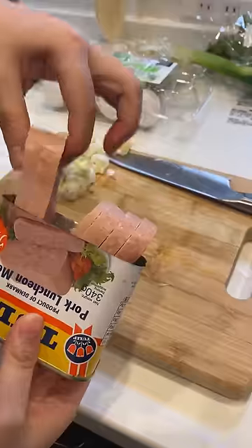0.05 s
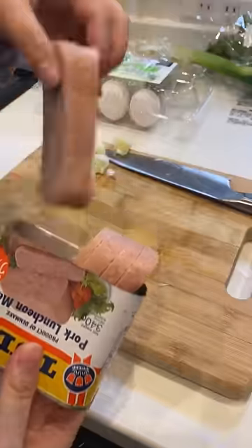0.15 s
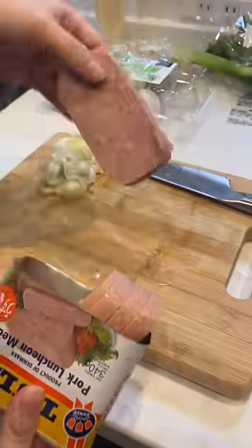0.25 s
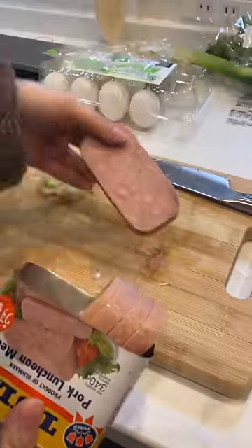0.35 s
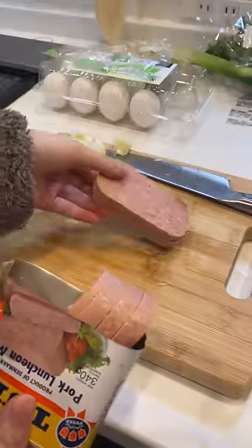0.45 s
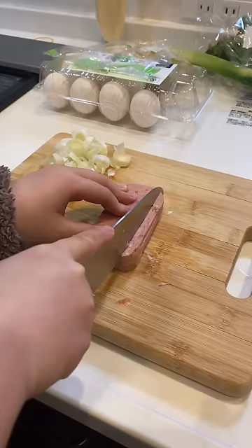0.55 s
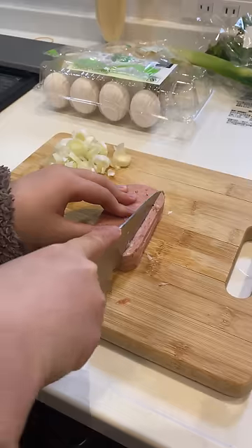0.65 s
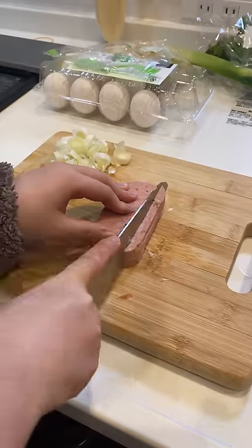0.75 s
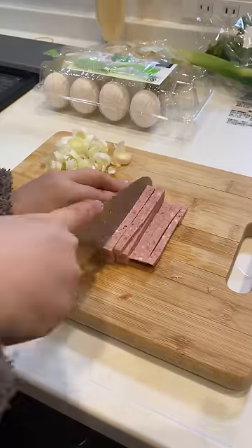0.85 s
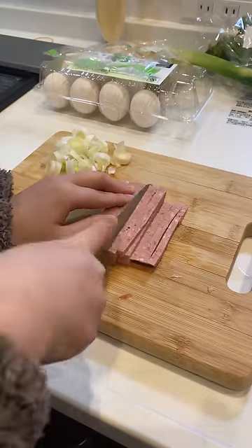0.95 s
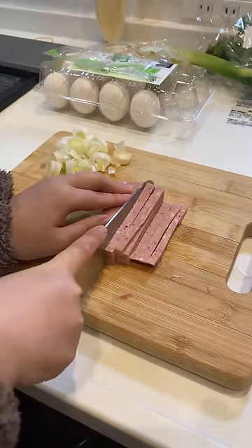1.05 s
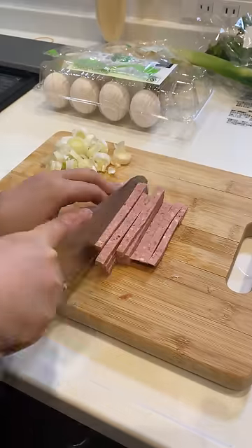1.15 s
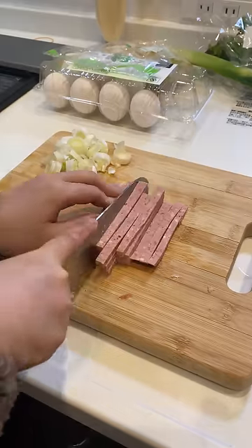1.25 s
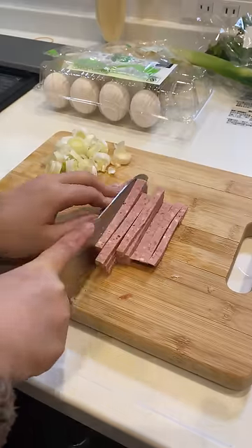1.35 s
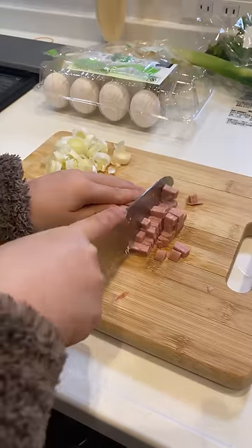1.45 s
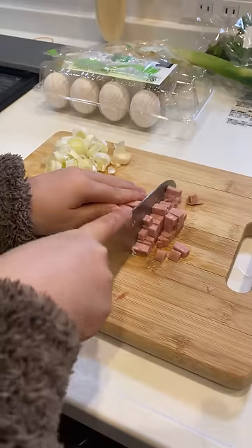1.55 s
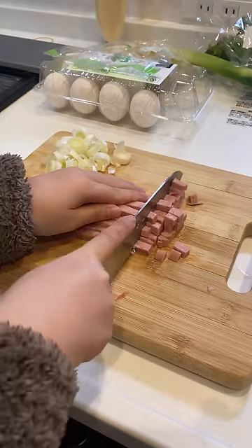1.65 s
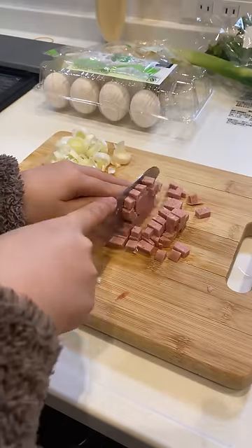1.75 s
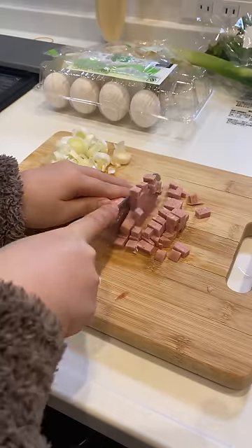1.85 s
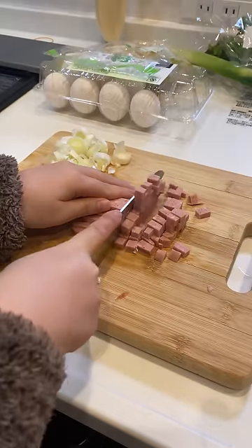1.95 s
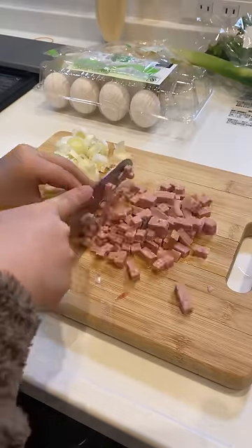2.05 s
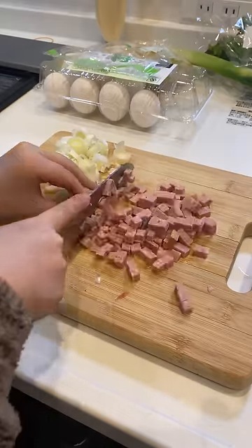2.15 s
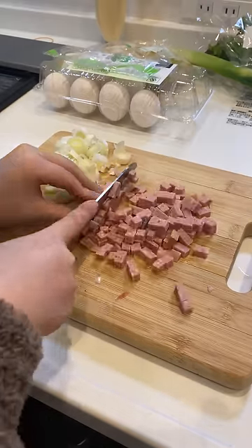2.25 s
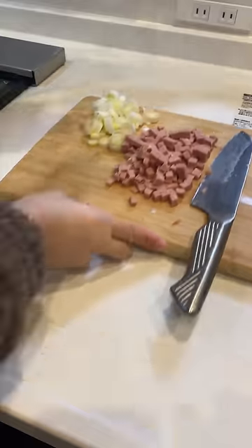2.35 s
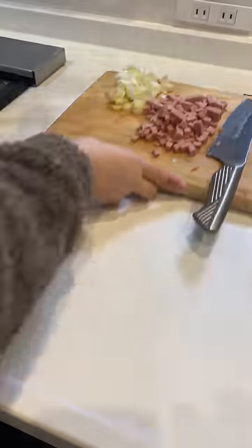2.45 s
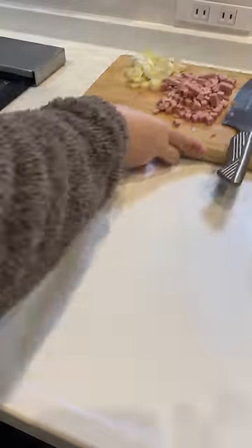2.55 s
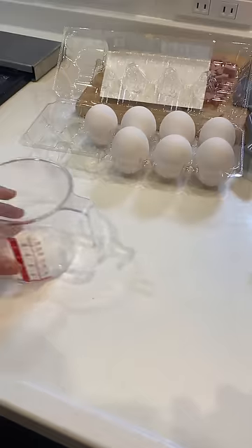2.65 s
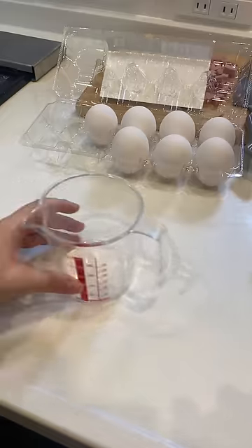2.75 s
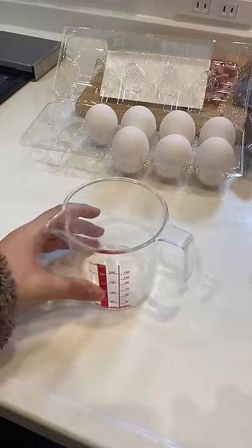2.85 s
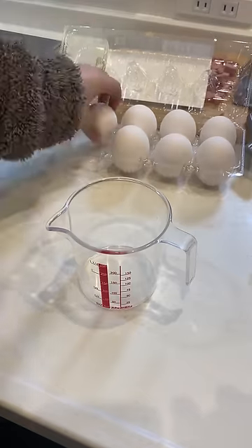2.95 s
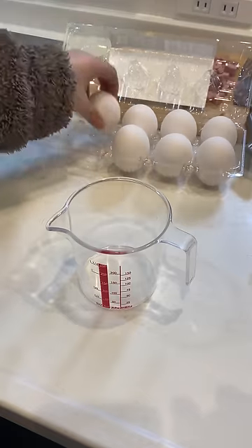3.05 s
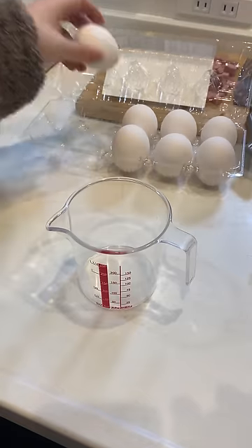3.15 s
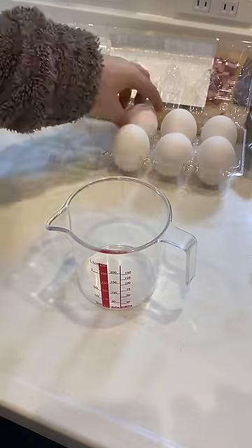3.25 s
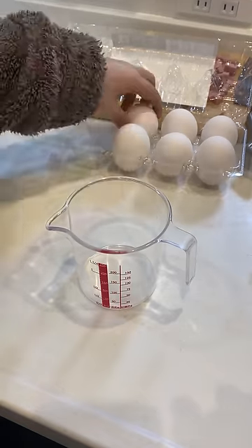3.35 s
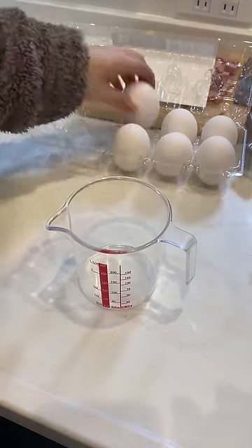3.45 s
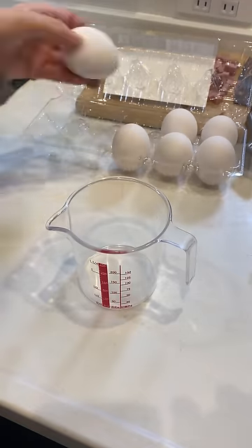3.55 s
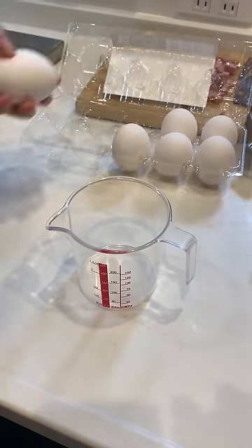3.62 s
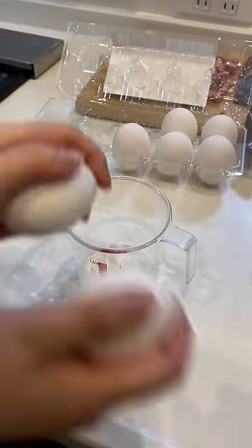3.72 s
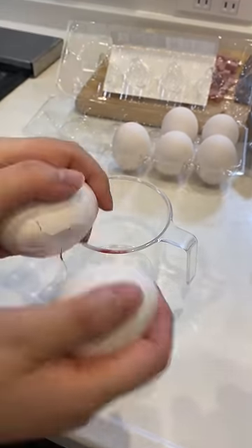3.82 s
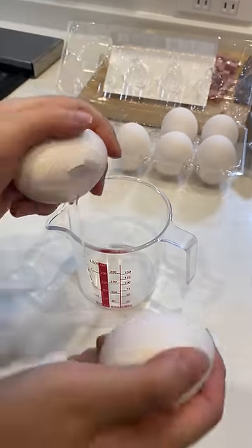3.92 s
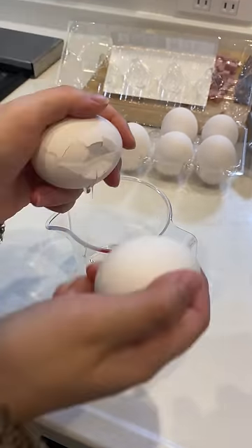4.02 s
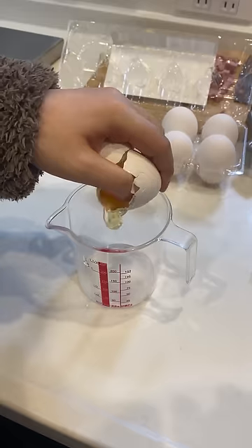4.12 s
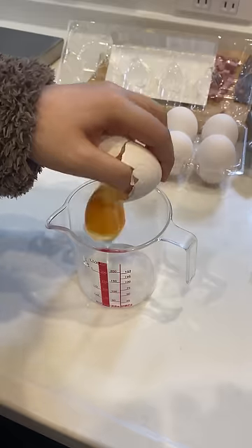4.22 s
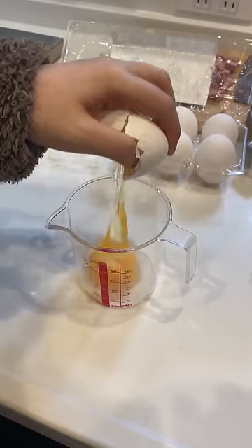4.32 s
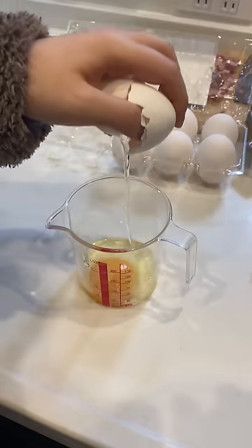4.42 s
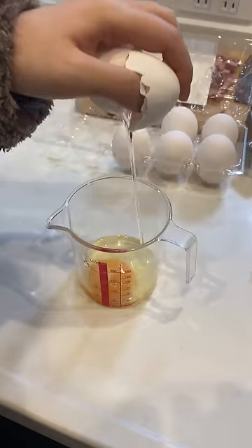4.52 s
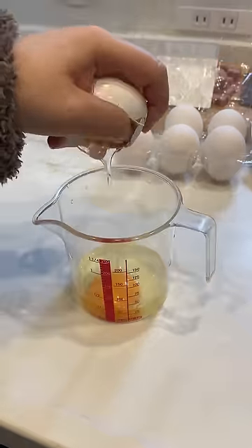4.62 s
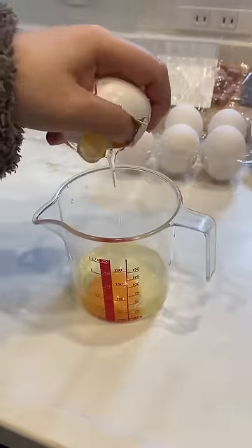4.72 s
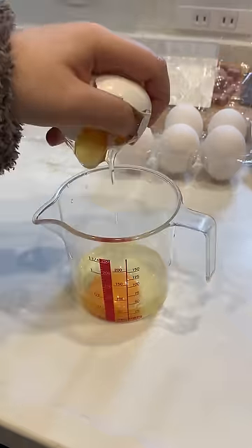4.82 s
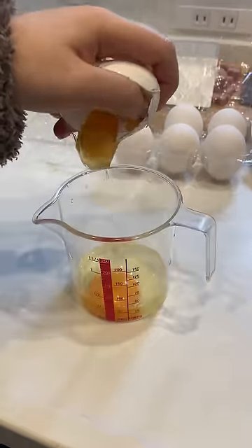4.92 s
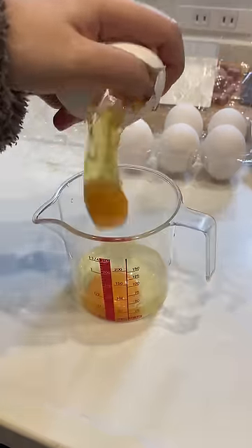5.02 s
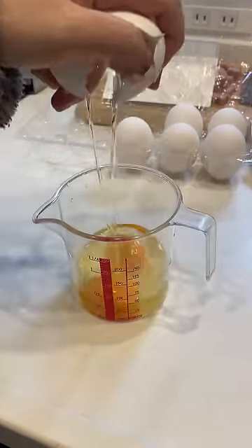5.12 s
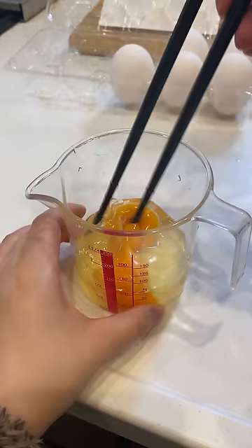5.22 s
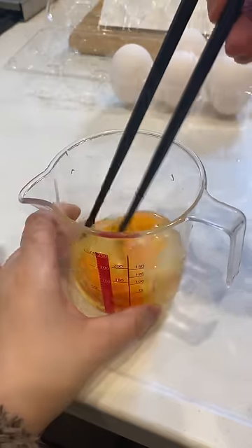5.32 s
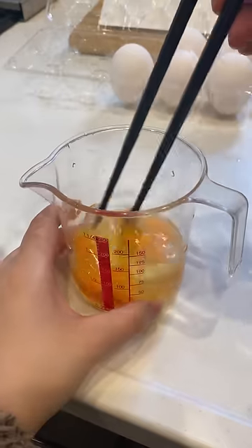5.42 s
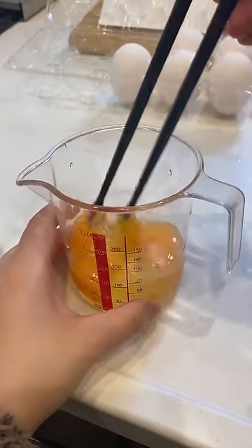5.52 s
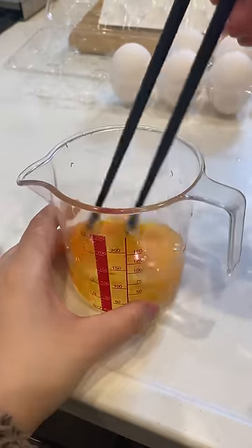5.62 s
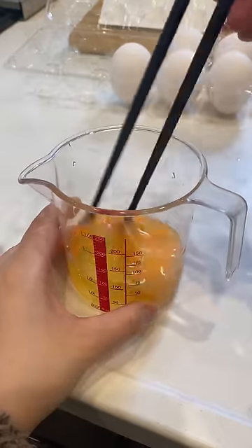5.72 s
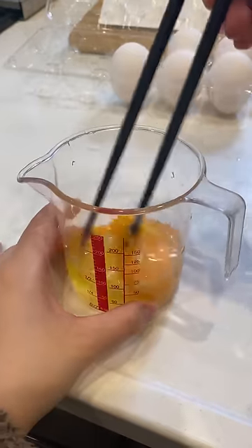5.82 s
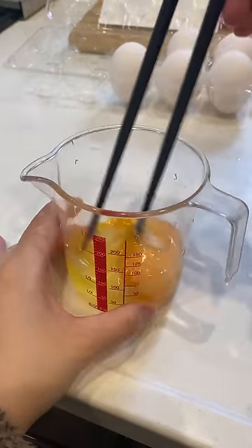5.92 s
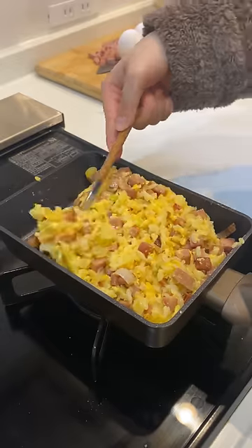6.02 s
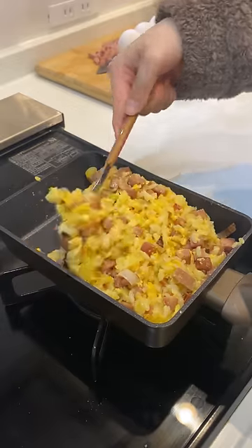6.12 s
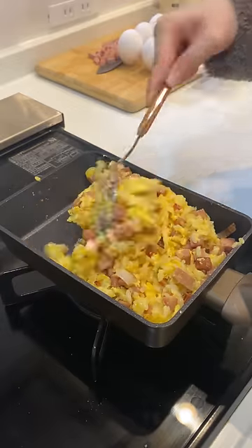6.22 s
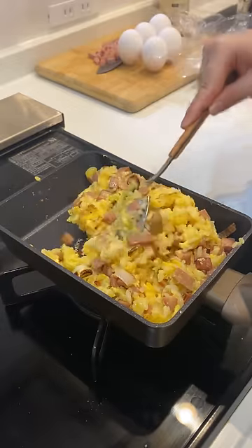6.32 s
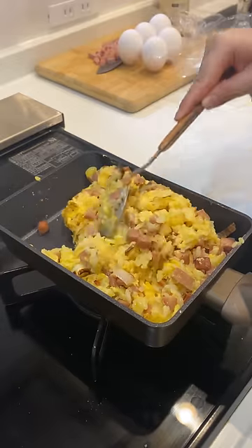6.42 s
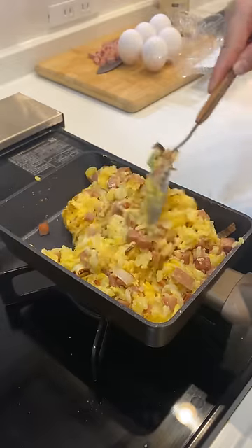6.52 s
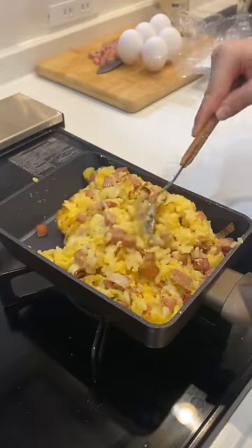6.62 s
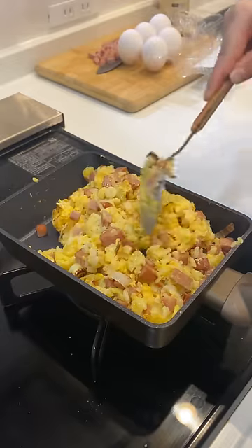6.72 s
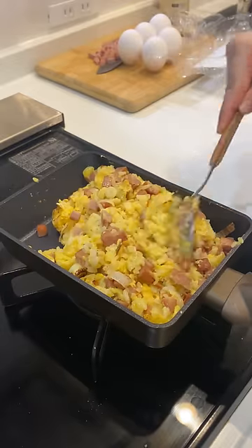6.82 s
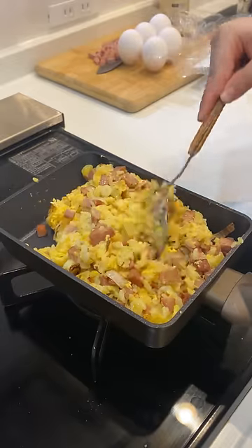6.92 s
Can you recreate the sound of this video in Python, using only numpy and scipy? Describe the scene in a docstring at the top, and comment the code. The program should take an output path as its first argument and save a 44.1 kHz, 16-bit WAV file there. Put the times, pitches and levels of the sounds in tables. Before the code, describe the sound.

In a quiet home kitchen, miked close by, a knife chops six times on a wooden board with faint rubbing. The board knocks and slides on the counter, a plastic cup scrapes, packaging crackles. An egg cracks sharply, its shell breaks with small wet pops, chopsticks clack quickly in the cup, and a pan sizzles, spits and takes two spatula hits.

```python
"""A knife dices meat on a wooden board in a quiet home kitchen, miked from close by on a phone in short, hard-cut shots.
The board and a plastic cup slide over the counter, packaging and shell crackle, an egg is cracked, chopsticks beat
in the cup, and a spatula turns rice that sizzles in a pan. Blows are noise bursts that ring damped modes;
rubbing, frying and room air are coloured noise. Echo and a left-right difference in the treble are added last."""
import sys
import numpy as np
from scipy import signal
from scipy.fft import rfft, irfft, next_fast_len
from scipy.io import wavfile
from scipy.ndimage import uniform_filter1d

SR = 44100
rng = np.random.default_rng(int(sys.argv[2]) if len(sys.argv) > 2 else 0)


def persist_wave(psi):
    """Save psi, clipped to +-1, as 16-bit WAV."""
    counts = np.round(np.clip(psi, -1, 1) * 32767).astype(np.int16)
    wavfile.write(sys.argv[1], SR, np.atleast_2d(counts).T)


N = 307356


def amp(db):
    """Gain of a level in dB."""
    return 10 ** (np.asarray(db) / 20)


def unit(x):
    """x scaled to rms 1."""
    return x / np.sqrt(np.mean(np.abs(x) ** 2) + 1e-20)


def along(points, hz):
    """Value at each frequency, read between (Hz, value) points on a log axis."""
    point_hz, value = np.transpose(points)
    return np.interp(np.log(hz + 1), np.log(point_hz + 1), value)


def shade(spectrum):
    """Gain over frequency of a (Hz, dB) table."""
    return lambda hz: amp(along(spectrum, hz))


def gains(rows):
    """One gain per sample for each dB column, silent outside the table."""
    s, *columns = np.transpose(rows)
    t = np.arange(N) / SR
    return [amp(np.interp(t, s, column, -200, -200)) for column in columns]


def filtered(x, response):
    """x shaped by a complex response of frequency."""
    n = x.shape[-1]
    padded = next_fast_len(n + 4096)
    spectrum = rfft(x, padded) * response(np.fft.rfftfreq(padded, 1 / SR))
    return irfft(spectrum, padded)[..., :n]


def peak(f, hz, width_hz):
    """Response of one causal resonance, 1 at its centre."""
    return 1j * f * width_hz / (hz * hz - f * f + 1j * f * width_hz)


# Left-right likeness of nearby sounds. Each row: frequency in Hz, likeness (1 = identical).
NEAR_LIKENESS = [(60, 0.26), (240, 0.88), (950, 0.97), (3770, 1), (15000, 0.91)]


def rush(colour, alike, patchy_db, grit_db):
    """Stereo noise of rms 1: patches of random gain, roughened by millisecond grains."""
    grit = amp(grit_db * np.repeat(rng.exponential(1, N // 32 + 1), 32)[:N])
    z = signal.stft(rng.standard_normal((2, N)) * grit, nperseg=256)[2]
    field = uniform_filter1d(rng.standard_normal(z.shape[1:]), size=5, axis=0)  # smooth over frequency
    field = uniform_filter1d(field, size=8, axis=1)  # and over time
    pair = signal.istft(z * amp(patchy_db * unit(field)), nperseg=256)[1][:, :N]

    def mid_side(hz):
        angle = np.arccos(np.clip(along(alike, hz), -1, 1)) / 2
        return colour(hz) * [np.cos(angle), np.sin(angle)]

    mid, side = filtered(pair, mid_side)
    return unit(np.array([mid + side, mid - side]))


def ring(modes, t, wander=.013):
    """Sum of damped modes whose strength and pitch vary randomly with the point of contact."""
    hz, db, t60 = np.transpose(modes)[:, :, None]
    chance = rng.standard_normal((2, len(hz), 1))
    decay = amp(db + 2.5 * chance[0] - 60 * t / t60)
    return np.sum(decay * np.sin(2 * np.pi * hz * (1 + wander * chance[1]) * t), 0)


# Where one shot is cut to the next. Each entry: time in seconds.
SHOT_CUTS = [0.036, 0.575, 0.848, 1.149, 1.433, 1.733, 2.021, 2.286, 2.599, 2.916, 3.647, 4.059, 4.63,
             5.243, 5.958]


def add(track, s, sound, db, pan_db):
    """Lays a sound of the given peak level into the stereo track, up to the next cut."""
    room_s = min([cut - s for cut in SHOT_CUTS if cut > s], default=1)
    sound = amp(db) * sound[:round(room_s * SR) + 1] / np.abs(sound).max()
    start = round(s * SR)
    track[:, start:start + len(sound)] += sound * amp([[pan_db / 2], [-pan_db / 2]])  # positive is left


def contact(modes, ring_db, contact_s, bright_db, low_hz, rattle_db, rattle_s, size=SR // 5):
    """A decaying noise force and its longer rattle are heard directly and through the modes they excite."""
    t = np.arange(size) / SR
    force = rng.standard_normal(len(t)) * (amp(-60 * t / contact_s) + amp(rattle_db - 60 * t / rattle_s))
    force[0] = 2.59  # a strong first sample, so that every blow excites all modes
    ringing = signal.fftconvolve(force, ring(modes, t))[:len(t)]
    sound = force / np.abs(force).max() + amp(ring_db) * ringing / np.abs(ringing).max()

    def tilt(f):
        slope = (1 + 1j * f / 500) ** (bright_db / (20 * np.log10(2)))  # dB per octave above 500 Hz
        return slope * (1j * f / (low_hz + 1j * f)) ** 2

    return filtered(sound, tilt)


# What the counter rings with. Each row: frequency in Hz, relative level in dB, t60 in seconds.
COUNTER_MODES = [(99, -9.5, 0.05), (159, -4, 0.09), (205, 0, 0.07), (252, 0, 0.05), (334, 2, 0.038),
                 (456, -2, 0.065), (572, -2.5, 0.089), (700, -5.5, 0.021), (1015, -2, 0.022)]


def blows(rows, modes, ring_db, contact_s, low_hz, rattle_db, rattle_s, thud_db, thud_grows, pan_db):
    """Blows on one body, each passing a soft thud into the counter."""
    track = np.zeros((2, N + SR))

    def soft(f):  # cuts the deep bass and softens the treble of the thud
        return (1j * f / (110 + 1j * f)) ** 2 / (1 + 1j * f / 1500) ** 2

    for s, db, bright_db in rows:
        blow = contact(modes, ring_db, contact_s, bright_db, low_hz, rattle_db, rattle_s)
        add(track, s, blow, db, pan_db)
        thud = filtered(ring(COUNTER_MODES, np.arange(SR // 4) / SR), soft)
        add(track, s, thud, thud_db + thud_grows * db, 0)
    return track[:, :N]


def harder(rows, bright_db, per_db):
    """Adds the brightness column, which rises by per_db for each dB of peak level."""
    return [(s, db, bright_db + per_db * db) for s, db in rows]


def snaps(rows, ring_db, cycles, contact_s, low_hz, bright_db, wide_db):
    """Tiny dry breaks, each coloured by a few cycles of the fragment or bubble that it leaves."""
    track = np.zeros((2, N + SR))
    for s, db, hz in rows:
        sound = contact([(hz, 0, cycles / hz)], ring_db, contact_s, bright_db, low_hz,
                        rattle_db=-17, rattle_s=.03, size=SR // 16)
        add(track, s, sound, db, wide_db * rng.standard_normal())
    return track[:, :N]


# Colour of the room air. Each row: frequency in Hz, relative level in dB.
AIR_COLOUR = [(12, -45), (20, 0), (42, -22.5), (137, -15.5), (232, -25), (405, -13.5), (441, -20),
              (728, -17.5), (1110, -21), (2850, -29), (3280, -28), (3870, -30), (15600, -38.5)]
# Left-right likeness of the room air. Each row: frequency in Hz, likeness.
AIR_LIKENESS = [(60, 4.5), (240, 0), (950, 0.5), (3770, 0.4), (15000, 0.5)]
# An appliance that hums through one shot. Each row: frequency in Hz, rms level in dB.
APPLIANCE_HUM = [(414, -69.5), (828, -79)]
# Faint narrow hisses of the room. Each row: frequency in Hz, resonance width in Hz, rms level in dB.
ROOM_WHINE = [(3274, 110, -86.5), (750, 25, -83), (895, 40, -83)]


def air():
    """Steady room noise, narrow bands of filtered noise, and an appliance's sine hum in one shot."""
    t = np.arange(N) / SR
    hum = sum(np.sqrt(2) * amp(db) * np.sin(2 * np.pi * hz * t) for hz, db in APPLIANCE_HUM)
    hum = hum * (t > SHOT_CUTS[11]) * (t < SHOT_CUTS[12])
    whine = 0
    for hz, width_hz, db in ROOM_WHINE:
        hiss = filtered(rng.standard_normal(N), lambda f: peak(f, hz, width_hz) ** 2)
        whine = whine + amp(db) * unit(hiss)
    return amp(-67) * rush(shade(AIR_COLOUR), AIR_LIKENESS, patchy_db=-2.0, grit_db=-2.5) + hum + whine


# Blade, food, fingers and packaging rub close to the microphone.
# Each row: start in seconds, length in seconds, level in dB, share of treble from 0 to 1.
HAND_RUBS = [(0, 0.037, -51.5, 0.58), (0.662, 0.07, -51.5, 0.12), (1.526, 0.11, -62.5, 0),
             (1.647, 0.039, -65, 0), (2.919, 0.06, -54.5, 0.4), (2.987, 0.06, -44.5, 0),
             (3.269, 0.12, -57, 0.06), (3.588, 0.1, -71, 1), (4.058, 0.098, -57, 0.78),
             (4.272, 0.066, -54, 0.2), (4.63, 0.074, -56.5, 0.84), (4.719, 0.091, -53, 1),
             (4.792, 0.16, -57, 0.1), (4.985, 0.13, -64, 0.13), (5.243, 0.051, -48, 0.03)]
# A faint rub around each chop: start in seconds relative to the chop, then length, level and treble as above.
BLADE_RUB = (-0.06, 0.28, -68, 0.76)
# Colour of the dull rubs. Each row: frequency in Hz, relative level in dB.
DULL_RUSTLE = [(300, -37), (700, -13), (1800, -6), (3300, -19), (5000, -17.5), (8200, -21), (9600, -40),
               (16500, -53)]
# Colour of the bright rubs. Each row: frequency in Hz, relative level in dB.
BRIGHT_SWISH = [(1000, -32), (3000, -11), (7000, 9.5), (10000, 2), (14000, 5), (16500, -12.5)]


def hands():
    """Noise strokes that swell and die, each mixed between a dull rustle and a bright swish."""
    t = np.arange(N) / SR
    dull, bright = np.zeros((2, N))
    blade = [(chop_s + BLADE_RUB[0], *BLADE_RUB[1:]) for chop_s, *_ in KNIFE_CHOPS]
    for s, length_s, db, treble in list(HAND_RUBS) + blade:
        stroke = amp(db) * np.sin(np.pi * np.clip((t - s) / length_s, 0, 1) ** 0.53)  # rises faster than it falls
        dull += stroke * np.sqrt(1 - np.clip(treble, 0, 1))
        bright += stroke * np.sqrt(np.clip(treble, 0, 1))
    rustle = dull * rush(shade(DULL_RUSTLE), NEAR_LIKENESS, patchy_db=2, grit_db=2)
    return rustle + bright * rush(shade(BRIGHT_SWISH), NEAR_LIKENESS, patchy_db=4.5, grit_db=2.0)


# Level of the low rumble. Each row: time in seconds, level in dB.
RUMBLE_LEVEL = [(0, -65), (.45, -62), (1.45, -59.5), (1.62, -49.5), (1.95, -60), (2.3, -60), (2.45, -47),
                (2.6, -67), (3, -61.5), (4.2, -67.5), (5.2, -66), (5.28, -53.5), (5.6, -51), (5.95, -52.5)]
# Colour of the low rumble. Each row: frequency in Hz, relative level in dB.
RUMBLE_COLOUR = [(30, -14.5), (60, -7), (110, -7.5), (150, 1), (210, -7), (330, -11), (700, -24.5),
                 (1500, -94.5)]


def weight():
    """A low rumble of bass noise, perhaps the counter under the working hands."""
    return gains(RUMBLE_LEVEL)[0] * rush(shade(RUMBLE_COLOUR), NEAR_LIKENESS, patchy_db=3.5, grit_db=0)


# Hands, board and cup knock the counter.
# Each row: start in seconds, peak level in dB, brightness in dB per octave.
COUNTER_BUMPS = [(0.465, -57, -24), (0.72, -42.5, -7), (1.593, -43.5, -7.5), (1.69, -29.5, -5.5),
                 (1.968, -44, -12), (2.356, -8.5, -8.5), (2.481, -33.5, -6), (2.56, -35, 3),
                 (3.005, -38, -4.5), (3.085, -42, -8.5), (3.386, -45, -8), (4.27, -36, -7),
                 (4.291, -32, -9), (5.124, -32.5, -7), (5.28, -29.5, -12.5)]


def bumps():
    """Fairly long contacts that set the counter's low modes ringing."""
    return blows(COUNTER_BUMPS, COUNTER_MODES, ring_db=-30, contact_s=0.032, low_hz=230, rattle_db=-10.5,
                 rattle_s=0.13, thud_db=-3, thud_grows=1.0, pan_db=1.0)


# The knife meets the board. Each row: start in seconds, peak level in dB, brightness in dB per octave.
KNIFE_CHOPS = [(0.633, -19.5, -4.5), (0.933, -26, -4), (1.185, -23, -4), (1.496, -16.5, 1),
               (1.817, -15.5, -1.5), (2.104, -22.5, -5)]
# What the wooden board rings with. Each row: frequency in Hz, relative level in dB, t60 in seconds.
BOARD_MODES = [(525, -17, .03), (820, -17, .025), (1100, -13, .015), (1330, -11, .015), (1590, 0, .025),
               (1840, -3, .02), (2100, -5, .018), (2500, -9, .012), (3850, -7, .012), (5400, -9, .006),
               (7500, -24, .005)]


def chops():
    """Very short contacts in which the ringing wood outweighs the crack."""
    return blows(KNIFE_CHOPS, BOARD_MODES, ring_db=14.5, contact_s=0.0051, low_hz=416, rattle_db=-21,
                 rattle_s=0.077, thud_db=-23, thud_grows=0.32, pan_db=-3.5)


# The board slides over the counter. Each row: time in seconds, level in dB.
BOARD_SLIDE_LEVEL = [(2.287, -45), (2.32, -46), (2.45, -47), (2.48, -42.5), (2.6, -47)]
# Colour of wood on the counter. Each row: frequency in Hz, relative level in dB.
WOOD_COLOUR = [(120, -34), (200, -19), (304, -4), (407, -12), (608, -8), (892, -16.5), (1280, -12.5),
               (3250, -17.5), (7660, -11.5), (15600, -14)]
# The cup is dragged over the counter. Each row: time in seconds, level in dB.
CUP_SLIDE_LEVEL = [(2.601, -46.5), (2.66, -37.5), (2.72, -39.5), (2.8, -43), (2.83, -49), (2.88, -56.5),
                   (2.917, -77)]
# Colour of plastic on the counter. Each row: frequency in Hz, relative level in dB.
CUP_COLOUR = [(180, -47), (300, -13.5), (970, -5), (1380, -10), (1690, -3), (3190, -11.5), (14900, -12.5),
              (15700, -5), (16500, -36)]
# Resonances of the cup wall. Each row: frequency in Hz, width in Hz, relative level in dB.
CUP_WALL_PEAKS = [(990, 150, -9), (1710, 150, -3.5), (5750, 140, -1), (8700, 150, -18), (10100, 240, -1),
                  (11800, 190, -3), (13200, 270, -15), (14700, 320, -14)]


def slides():
    """The board hisses over the counter; the dragged cup's noise sings in its wall resonances."""
    board = gains(BOARD_SLIDE_LEVEL)[0] * rush(shade(WOOD_COLOUR), NEAR_LIKENESS, patchy_db=2.0, grit_db=0.6)

    def wall(f):
        singing = sum(amp(db + 7.0) * peak(f, hz, width_hz) for hz, width_hz, db in CUP_WALL_PEAKS)
        return shade(CUP_COLOUR)(f) * np.abs(1 + singing)

    return board + gains(CUP_SLIDE_LEVEL)[0] * rush(wall, NEAR_LIKENESS, patchy_db=3.0, grit_db=1.0)


# Egg shell and thin packaging crackle. Each row: start in seconds, peak level in dB, loudest frequency in Hz.
SHELL_CRACKLES = [(2.9284, -39, 2780), (2.945, -39, 3800), (2.978, -32.5, 6440), (3.0099, -26, 4100),
                  (3.0225, -40, 2430), (3.2973, -27.5, 4000), (3.3305, -41, 3550), (3.9, -40, 5110),
                  (4.0718, -34, 8000), (4.0835, -25, 7940), (4.0969, -46, 4070), (4.115, -31, 4460),
                  (4.12, -32.5, 4630), (4.2027, -28.5, 8200), (4.2164, -40, 7700), (4.2712, -20.5, 4800),
                  (4.3265, -24, 3970), (4.3773, -38.5, 7300), (4.438, -45.5, 7160), (4.4706, -23.5, 4300),
                  (4.6362, -43.5, 4800), (4.717, -39, 12100), (4.726, -25, 8000), (4.732, -18, 7640),
                  (4.739, -8, 7860), (4.7927, -41, 7040), (4.812, -26, 6900), (4.8184, -16.5, 7350),
                  (4.8773, -42, 5850), (4.9026, -25.5, 6120), (4.9875, -32, 2720), (5.022, -41, 6000),
                  (5.045, -45, 3500), (5.1248, -39, 3730), (5.176, -51, 7000)]


def crackles():
    """Breaks of shell and packaging, each ringing a few cycles at its own pitch."""
    return snaps(SHELL_CRACKLES, ring_db=-4.5, cycles=7.2, contact_s=0.0063, low_hz=1624, bright_db=1.3, wide_db=0.0)


# Hard blows shake the phone. Each row: start in seconds, peak level in dB.
PHONE_JOLTS = [(3.7205, -35), (5.301, -42), (6.554, -38.5)]


def jolts():
    """Each blow gives the microphone membranes one slow push and return."""
    track = np.zeros((2, N + SR))
    u = np.arange(SR // 8) / SR / .006  # time in units of 6 ms
    for s, db in PHONE_JOLTS:
        add(track, s, u * (1 - u / 2) * np.exp(-u), db, 0)
    return track[:, :N]


# The egg is struck. Each row: start in seconds, peak level in dB.
EGG_BLOW = [(3.7215, 2.5)]
# What the shell rings with. Each row: frequency in Hz, relative level in dB, t60 in seconds.
SHELL_MODES = [(670, -14, .005), (1170, -11, .005), (3950, -3, .003), (5150, 0, .003), (12300, 1, .002)]


def egg():
    """A bright crack with the very short ring of a thin shell."""
    return blows(harder(EGG_BLOW, bright_db=1.16, per_db=0), SHELL_MODES, ring_db=-2.5, contact_s=0.0095, low_hz=203,
                 rattle_db=-19.0, rattle_s=0.042, thud_db=-48, thud_grows=0, pan_db=2.0)


# The air in the opening shell pops, mostly higher as the gap widens.
# Each row: start in seconds, peak level in dB, frequency in Hz.
SHELL_POPS = [(4.7247, -37, 1420), (4.7379, -29.5, 1542), (4.7947, -40.5, 1520), (4.8119, -31, 1740),
              (4.9007, -28.5, 1965), (4.9866, -31.5, 2600), (5.0004, -40.5, 2720)]


def hollow():
    """Short wet pops of trapped air: one damped resonance driven by a fading noise burst."""
    track = np.zeros((2, N + SR))
    t = np.arange(SR // 5) / SR
    for s, db, hz in SHELL_POPS:
        cavity = ring([(hz, 0, 0.038)], t)  # t60 in seconds
        burst = rng.standard_normal(400) * np.hanning(800)[400:]
        add(track, s, signal.fftconvolve(cavity, burst), db, 0)
    return track[:, :N]


# One chopstick strikes the cup just before the other.
# Each row: start in seconds, peak level in dB, lead of the first stick in seconds, its peak level in dB.
CHOPSTICK_BEATS = [(5.306, -4.5, 0.012, -22), (5.43, -5, .013, -10), (5.511, -5.5, .008, -16),
                   (5.615, -0.5, .006, -13), (5.716, 4, .009, -13), (5.826, 4, 0.0087, -19.5),
                   (5.927, -1, 0.0045, -34)]
# Further single strikes of a chopstick on the cup, without a lead. Each row: start in seconds, peak level in
# dB.
CHOPSTICK_SINGLE_STRIKES = [(5.338, -19), (5.55, -18.5)]
# What the plastic cup rings with. Each row: frequency in Hz, relative level in dB, t60 in seconds.
CUP_MODES = [(240, -2, .07), (567, -7, .045), (900, -17, .03), (1990, -4, .025), (2900, -7, .008),
             (3300, -7, .012), (3960, -7, .012), (4750, -7, .01), (5870, -3, .014), (7500, -9, .005),
             (11200, -9, .006), (14800, -8, .006)]


def chopsticks():
    """Both sticks and a few further single strikes hit the cup, brighter when harder, with a long faint rattle."""
    first = [(s - lead_s, first_db) for s, _, lead_s, first_db in CHOPSTICK_BEATS]
    second = [(s, db) for s, db, *_ in CHOPSTICK_BEATS]
    rows = harder(first + second + list(CHOPSTICK_SINGLE_STRIKES), bright_db=1.34, per_db=0.1265)
    return blows(rows, CUP_MODES, ring_db=-5.0, contact_s=0.03, low_hz=250, rattle_db=-53,
                 rattle_s=0.38, thud_db=-23.5, thud_grows=1.0, pan_db=1.4)


# The pan's steady sound. Each row: time in seconds, fizz level in dB, stirring level in dB.
SIZZLE_LEVEL = [(5.96, -36.5, -39.5), (6.05, -40, -54.5), (6.25, -39, -55.5), (6.3, -34.5, -55),
                (6.45, -42, -61.5), (6.6, -33.5, -40.5), (6.7, -39, -57.5), (6.8, -35.5, -51),
                (6.97, -39, -55)]
# Colour of the steam. Each row: frequency in Hz, relative level in dB.
FIZZ_COLOUR = [(410, -46), (700, -9), (1050, -15), (1240, -5.5), (1430, -13.5), (2130, -5.5), (3040, -7.5),
               (5580, -3), (14300, -9.5), (15900, -10), (16500, -40)]
# Colour of the pushed rice. Each row: frequency in Hz, relative level in dB.
STIR_COLOUR = [(35, -38), (60, -0.5), (306, -4.5), (412, 2), (962, -13), (1280, -22), (1500, -3.5),
               (1950, -28), (3300, -120)]


def frying():
    """Gritty noise of dense tiny steam bursts over the soft low push of the rice."""
    fizz, stir = gains(SIZZLE_LEVEL)
    steam = fizz * rush(shade(FIZZ_COLOUR), NEAR_LIKENESS, patchy_db=2.5, grit_db=3.0)
    return steam + stir * rush(shade(STIR_COLOUR), NEAR_LIKENESS, patchy_db=1.5, grit_db=1)


# The loudest spits of hot fat. Each row: start in seconds, peak level in dB, loudest frequency in Hz.
FAT_SPITS = [(6.1813, -14, 4300), (6.2296, -5.5, 7600), (6.2888, -15, 5100), (6.324, -20, 7600),
             (6.6476, -15.5, 8700), (6.6926, -12.5, 9100), (6.03, -24, 7660), (6.763, -6.5, 5800),
             (6.8182, -10.5, 3200), (6.8449, -9, 10700)]


def spits():
    """Bubbles of hot fat burst as bright snaps, scattered across the stereo width."""
    return snaps(FAT_SPITS, ring_db=-3.5, cycles=9.1, contact_s=0.0038, low_hz=1200, bright_db=1.94, wide_db=-2.5)


# The spatula hits the pan. Each row: start in seconds, peak level in dB.
SPATULA_BLOWS = [(6.553, 2.5), (6.802, -5)]
# What the pan rings with. Each row: frequency in Hz, relative level in dB, t60 in seconds.
PAN_MODES = [(780, -12, .02), (1280, -7, .015), (2180, -2, .008), (3050, -4, .008), (3900, -1, .008),
             (4600, -3, .005), (5600, -2, .005), (6800, -2, .007), (7400, -3, .007), (9000, -10, .004)]


def spatula():
    """Short contacts with the pan's well-damped modes, brighter when harder."""
    return blows(harder(SPATULA_BLOWS, bright_db=1.82, per_db=0.26), PAN_MODES, ring_db=7.5, contact_s=0.011,
                 low_hz=490, rattle_db=-16, rattle_s=0.15, thud_db=-32, thud_grows=0.75, pan_db=2.0)


# Reverberation of the kitchen. Each row: frequency in Hz, t60 in seconds.
KITCHEN_DECAY = [(150, 0.16), (1000, 0.24), (4000, 0.15), (14000, .17)]


def shots(near, far, steady):
    """Each shot has its own echo and ends abruptly; after the first, its steady sounds fade in."""
    out = np.zeros((2, N))
    edges = [0] + [round(s * SR) for s in SHOT_CUTS] + [N]
    for a, b in zip(edges, edges[1:]):
        hz, t, z = signal.stft(rng.standard_normal((2, SR // 3)), SR, nperseg=256)
        z[1] = along(NEAR_LIKENESS, hz)[:, None] * z[0] + 1.2 * z[1]  # the two microphone ports are close together
        decay = amp(-60 * t / along(KITCHEN_DECAY, hz)[:, None])
        tail = signal.istft(z * decay, SR, nperseg=256)[1]
        tail = tail / np.linalg.norm(tail, axis=1, keepdims=True)
        delayed = np.pad(far[a:b], (150, 0))  # samples before the first echo
        echo = signal.fftconvolve(delayed[None], tail, axes=1)
        # starts at -25 dB and rises on a 34 ms ramp
        fade = np.minimum(amp(-25) + np.arange(b - a) / (0.034 * SR), 1) if a else 1
        out[:, a:b] = near[:, a:b] + echo[:, :b - a] + fade * steady[:, a:b]
    return out


def scene():
    """All contacts with their share of echo, over the rubbing, frying and room air."""
    contacts = [(bumps(), -10), (chops(), -6.5), (crackles(), -12), (egg(), -13), (hollow(), -11),
                (chopsticks(), -14), (spits(), -11), (spatula(), -10)]  # (sound, echo dB)
    near = sum(sound for sound, _ in contacts)
    far = sum(amp(echo_db) * sound.mean(0) for sound, echo_db in contacts)
    steady = air() + hands() + slides() + frying()
    return shots(near, far, steady) + weight() + jolts()


def record(dry):
    """Makes left and right differ in the treble, softly clips the hardest blows and limits the band."""
    high = filtered(dry.mean(0), lambda f: (1j * f / (5000 + 1j * f)) ** 3)
    shot = np.searchsorted(SHOT_CUTS, np.arange(N) / SR)
    difference = np.zeros(N)
    for k in range(len(SHOT_CUTS) + 1):
        # a short random noise filter, drawn anew for each shot
        noise = rng.standard_normal(256) * amp(-60 * np.arange(256) / SR / 0.02)
        part = high[shot == k]
        difference[shot == k] = signal.fftconvolve(part, noise / np.linalg.norm(noise))[:len(part)]
    stereo = dry + amp(-2.5) * difference * [[1], [-1]]
    clipped = stereo / (1 + np.abs(stereo) ** 8) ** (1 / 8)
    return filtered(clipped, lambda hz: np.clip((16800 - hz) / 1000, 0, 1) ** 2)  # falls from 15.8 to 16.8 kHz


dry = scene()
out = record(dry)
persist_wave(out)
```